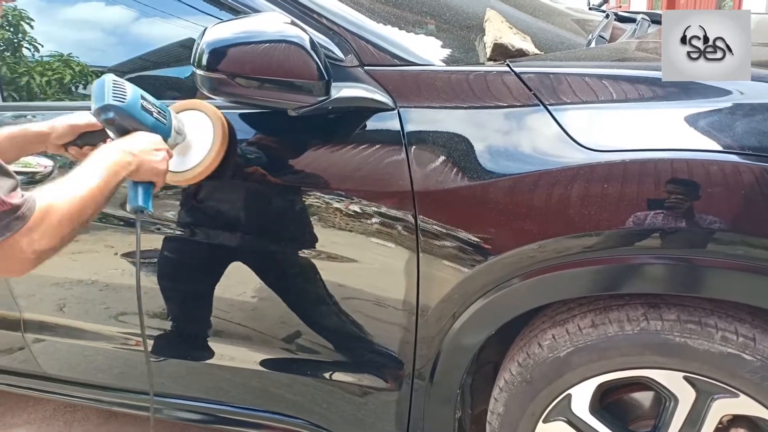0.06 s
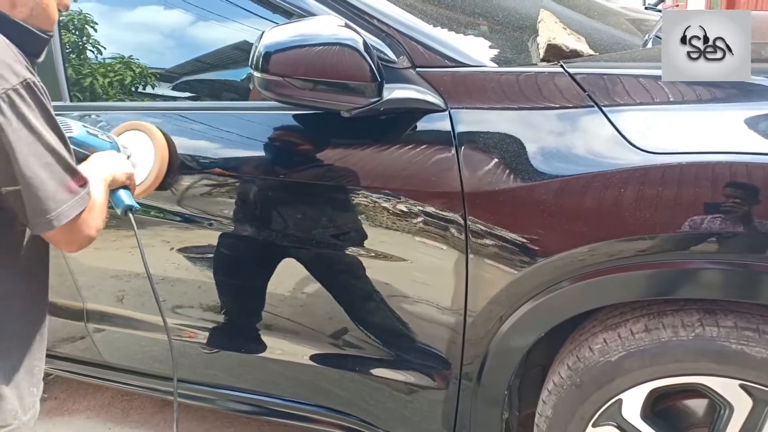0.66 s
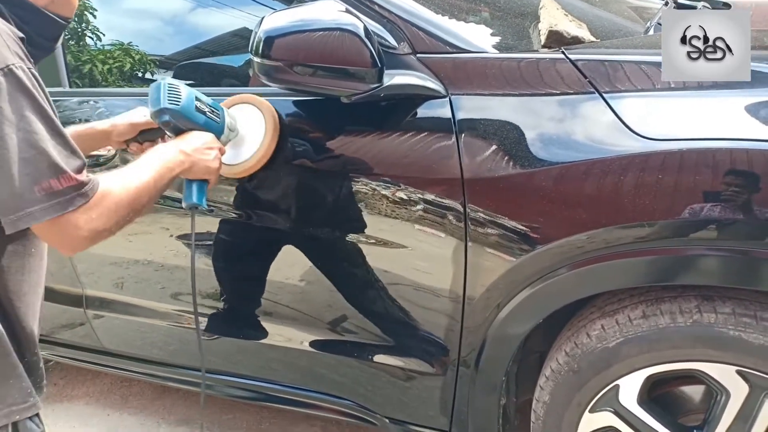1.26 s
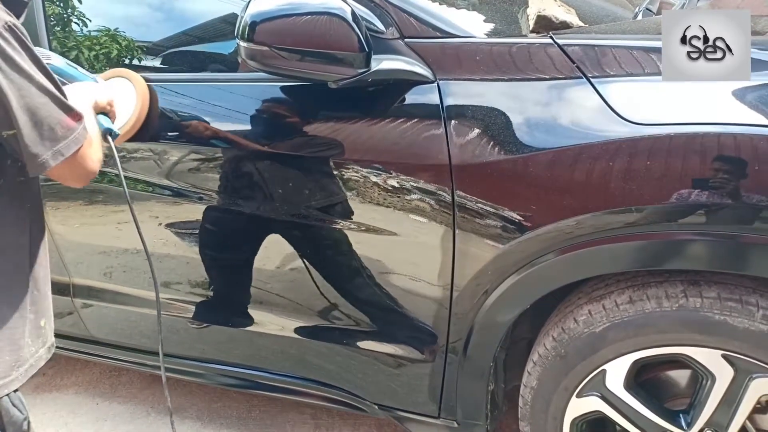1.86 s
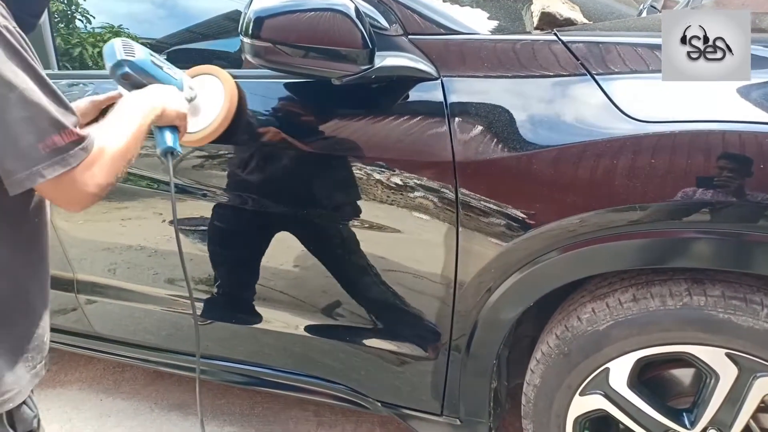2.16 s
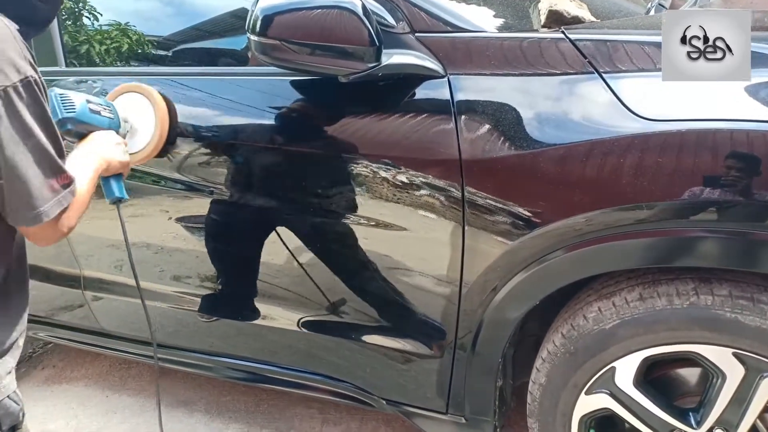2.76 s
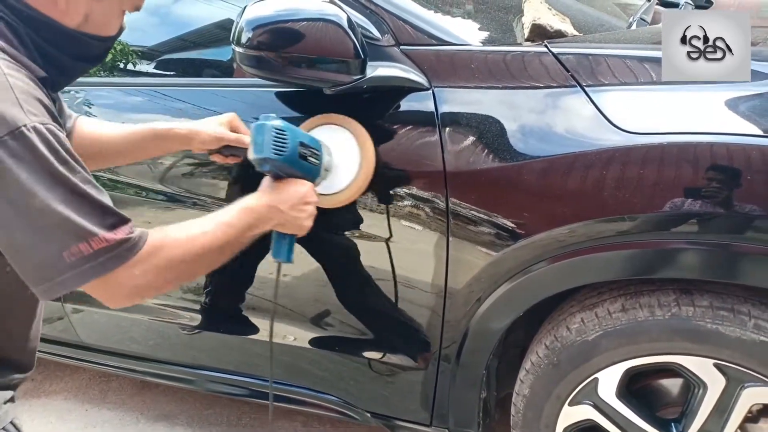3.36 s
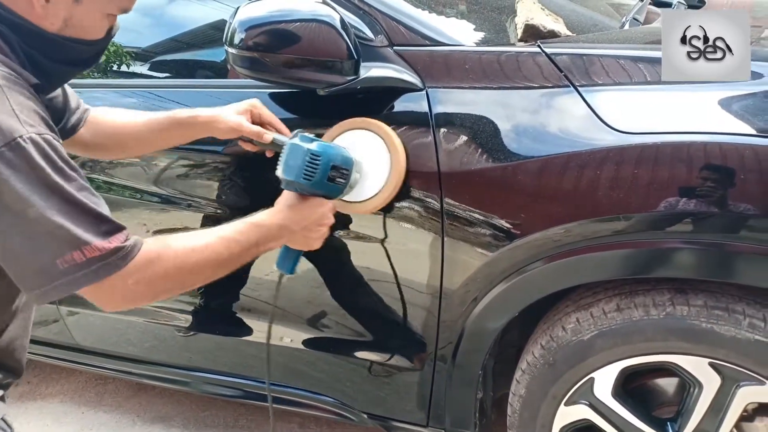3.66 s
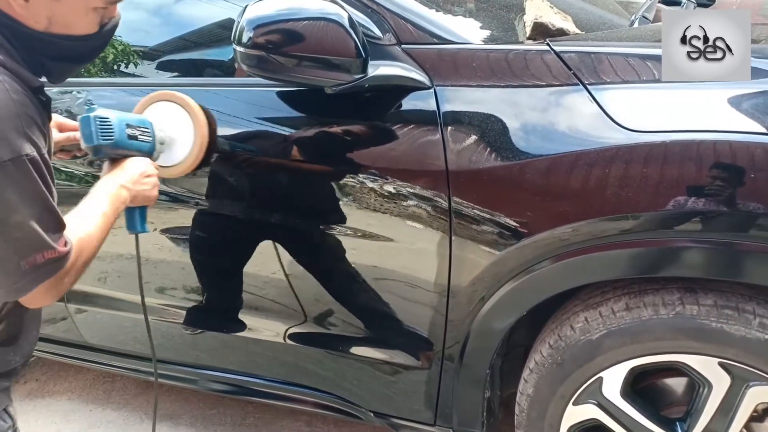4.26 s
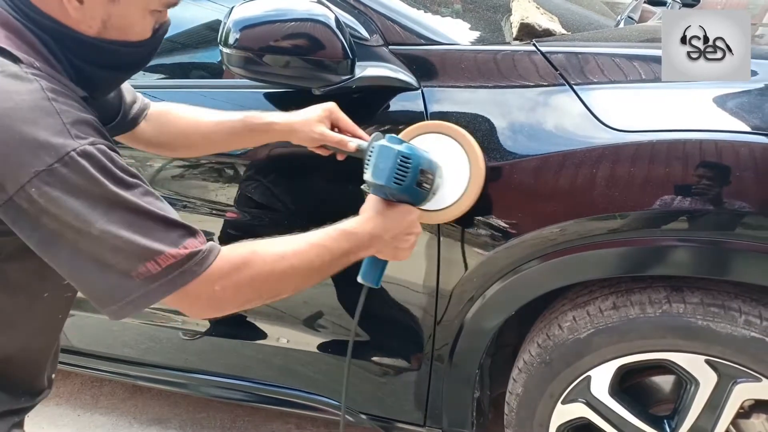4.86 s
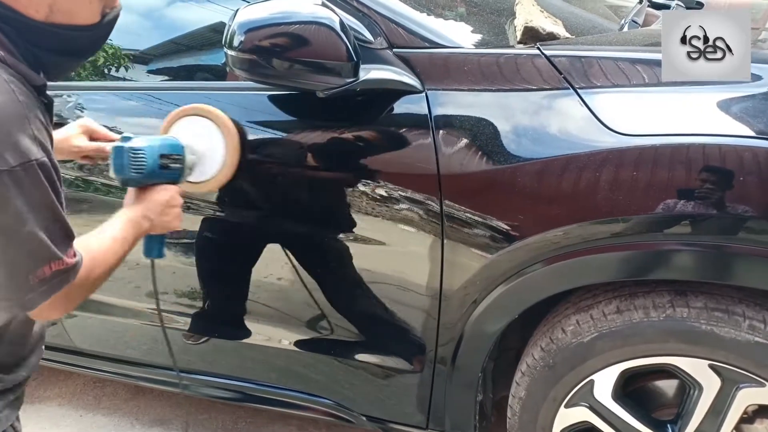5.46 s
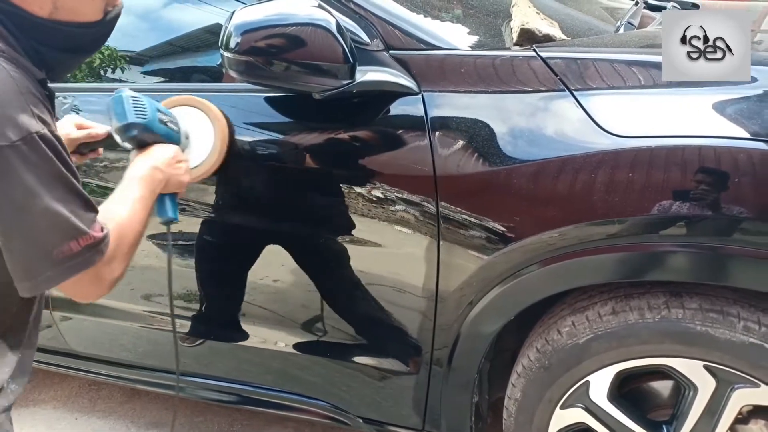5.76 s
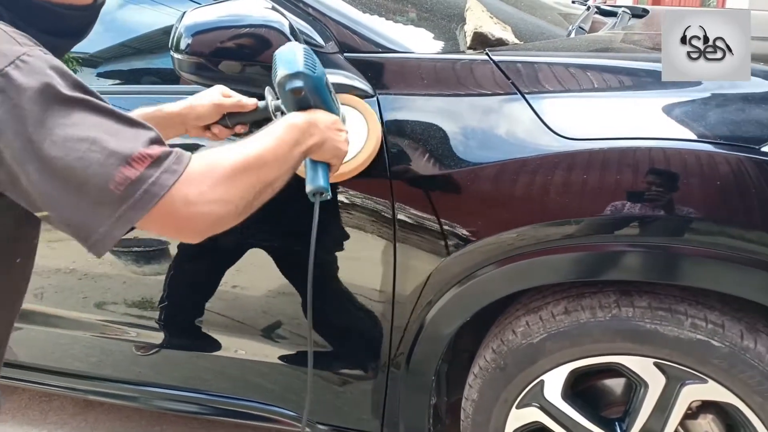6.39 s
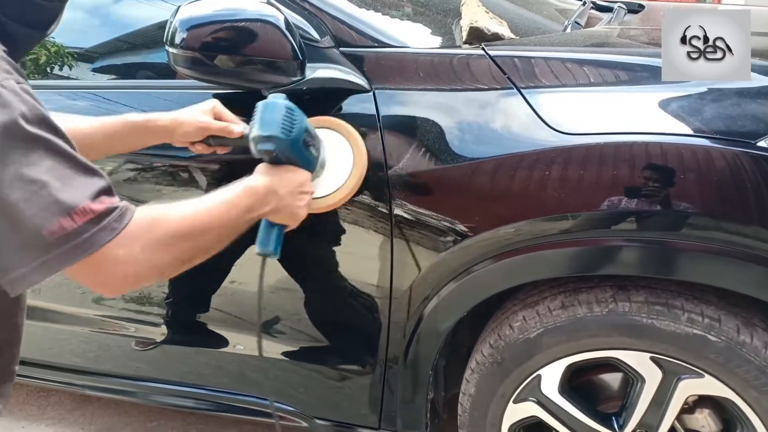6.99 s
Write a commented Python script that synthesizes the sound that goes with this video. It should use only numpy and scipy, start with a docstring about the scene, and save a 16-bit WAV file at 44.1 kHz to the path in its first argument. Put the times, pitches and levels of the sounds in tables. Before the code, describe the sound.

An electric rotary polisher runs without a break as its pad is worked to and fro over a car door. Its high, wavering whine dips and recovers about once a second, mixed with rushing air and light gear chatter. Midway the motor speeds up slightly and sounds hoarser, then sags again under pressure near the end. It is heard outdoors from a few metres away, over a faint low hum.

```python
"""A high whine that dips and recovers: an electric rotary polisher is worked to and fro over a car door.
The whine comes from the motor's small gear, whose teeth meet 22 times a turn. Each press on the pad
slows the motor and lowers the pitch. A second, slower shaft (the layshaft) adds tones, clatter and,
as the pad eases off, chatter. Cooling air rushes through the housing, all over a low outdoor hum.
A phone with two microphones hears it from a few metres away."""
import sys
import numpy as np
from scipy import signal
from scipy.fft import rfft, irfft
from scipy.io import wavfile
from scipy.ndimage import uniform_filter1d, map_coordinates

SR = 44100
rng = np.random.default_rng(int(sys.argv[2]) if len(sys.argv) > 2 else 0)


def store_wav(level_fs):
    """Save 16-bit WAV to argv[1]."""
    pcm = np.round(np.clip(np.atleast_2d(level_fs), -1, 1) * 32767)
    wavfile.write(sys.argv[1], SR, pcm.T.astype(np.int16))


N = 310015
TIME_S = np.arange(N) / SR
BIN_HZ = np.arange(N // 2 + 1) * SR / N
SIDES = np.array([[1], [-1]]) / 2  # splits a left-minus-right difference between the two sides


def undb(db):
    """Turn decibels into a gain."""
    return 10 ** (np.asarray(db) / 20)


def curves(table):
    """Join a table's points in time with straight lines, one curve for each value column."""
    times_s, *columns = np.transpose(table)
    return np.array([np.interp(TIME_S, times_s, column) for column in columns])


def spectrum(table):
    """Join a table's points in pitch, giving a value for every frequency."""
    hz, values = np.transpose(table)
    return np.interp(np.log(BIN_HZ + 1), np.log(hz), values)


def shape(sound, gain):
    """Filter a sound with one gain for each frequency."""
    return irfft(rfft(sound) * gain, N)


def below(hz, order=4):
    """Gains of a smooth filter that keeps what lies below hz."""
    return 1 / np.sqrt(1 + (BIN_HZ / hz) ** (2 * order))


def resonance(hz, centre_hz, width_hz):
    """A bell shape that is 1 at its centre."""
    return 1 / (1 + (2 * (hz - centre_hz) / width_hz) ** 2)


def swell(peak_s, rise_s, fall_s):
    """A smooth rise from 0 to 1 and back."""
    ramp = np.interp(TIME_S, [peak_s - rise_s, peak_s, peak_s + fall_s], [0, 1, 0])
    return np.sin(np.pi / 2 * ramp) ** 2


def flutter(hz, step=32):
    """A random wiggle with a typical size of 1, moving at rates up to about hz."""
    knots = np.arange(-SR // 2, N + step, step)
    smoothing = signal.butter(2, min(hz, SR / step / np.pi), fs=SR / step, output="sos")
    wiggle = signal.sosfilt(smoothing, rng.standard_normal(len(knots)))
    return np.interp(np.arange(N), knots, wiggle / wiggle.std())


def spin(cycles):
    """A tone as a turning arrow: its real part is the sound, and adding imaginary wiggles shakes it."""
    return np.exp(2j * np.pi * cycles)


# Tone colour of the outdoor hum: pitch_hz, relative_db
HUM_COLOUR = [(20, -17), (40, -28), (60, -12), (80, -13), (97, 0), (113, -35), (135, -7), (175, -4.5),
              (210, -10), (260, -7.5), (310, -14.5), (450, -11.5), (650, -17.5), (1500, -70)]
# How loud the hum is over time: time_s, gain_db
HUM_LOUDNESS = [(0, -45), (.5, -51), (3.6, -57.5), (4.4, -56), (5.2, -59), (5.85, -53), (7.03, -60)]
def outdoor_hum():
    """A low drone with one wavering note in it, nearly the same on both sides."""
    middle, side = shape(rng.standard_normal((2, N)), undb(spectrum(HUM_COLOUR)))
    drone = (middle + 0.72 * side * SIDES) / middle.std()
    note = np.sin(2 * np.pi * 134 * TIME_S + 1.76 * flutter(7.4))
    return (undb(-0.74) * drone + undb(-1.5) * note) * undb(curves(HUM_LOUDNESS) - 1.2 * SIDES)


def cooling_air(turns):
    """Three separate streams of rushing air, chopped once a turn by the fan."""
    return rng.standard_normal((3, N)) * (1 + 0.15 * np.cos(2 * np.pi * turns))


def tooth_clatter(lay_turns, harmonics=200):
    """Three streams of thin, sharp clatter: the same tooth flaws come round on every layshaft turn."""
    streams = []
    for _ in range(3):
        position = (lay_turns + .0008 * flutter(40)) % 1  # slack in the gears blurs the timing
        flaws = irfft(np.r_[0, spin(rng.random(harmonics))], 16 * harmonics)
        places = np.arange(len(flaws)) / len(flaws)
        streams.append(np.interp(position, places, flaws / flaws.std(), period=1))
    band = below(5300, order=2) * (1 - below(1200, order=2))
    return shape(np.array(streams), band) * undb(flutter(38))


def diffuse(streams, apart_hz, likeness):
    """Mix three streams into two: the microphones share the bass but mostly hear their own treble."""
    shared = np.maximum(below(apart_hz, order=1), likeness)
    return shape(streams[0], shared) + shape(streams[1:], np.sqrt(1 - shared ** 2))


def shaft_tones(turns, table, waver_db, blur_rad):
    """Wavering tones locked to a shaft; the higher ones drift more between the microphones."""
    tones = 0
    for multiple, db in table:
        phase = 2 * np.pi * (multiple * turns + rng.random()) + blur_rad * flutter(26)
        drift = min(multiple / 20, 1.3) * flutter(4.7) * SIDES
        tones += np.sqrt(2) * undb(db + waver_db * flutter(6.2)) * np.sin(phase + drift)
    return tones


# Tones locked to the motor shaft; those at 20, 21, 23 and 24 are side tones around the gear whine:
# cycles_per_motor_turn, relative_db
MOTOR_TONES = [(2, 21), (3, 12), (4, 19), (12, 15), (14, 13), (16, 15), (20, 18), (21, 22), (23, 20),
               (24, 19), (26, 15), (40, 21), (42, 15), (43, 18), (45, 23), (46, 16), (48, 24)]
# Tones of the second pair of gears: cycles_per_layshaft_turn, relative_db
LAYSHAFT_TONES = [(8, 15), (11, 10), (13, 18), (15, 12), (17, 13), (18, 11), (20, 17), (26, 18), (28, 14),
                  (29, 12), (30, 18), (32, 17), (36, 15), (37, 16), (43, 21), (57, 24), (58, 17), (60, 14),
                  (63, 17), (64, 20), (70, 16), (71, 19), (73, 19), (74, 18), (75, 14), (76, 19), (77, 15),
                  (79, 13)]
def running_noise(turns, lay_turns, sag_hz):
    """Air, clatter and shaft tones inside the tool; load makes the tones stand out of the noise."""
    tones = shaft_tones(turns, MOTOR_TONES, waver_db=2.5, blur_rad=.3)
    tones += shaft_tones(lay_turns, LAYSHAFT_TONES, waver_db=3, blur_rad=.35)
    rush = np.sqrt(SR / 2) * (undb(-8.5) * tooth_clatter(lay_turns) + undb(-4.5) * cooling_air(turns))
    return undb(-5 + 0.138 * sag_hz) * tones + diffuse(rush, apart_hz=2170, likeness=0.3)


# Borders between seven bands of the running noise: pitch_hz
BAND_EDGES = (1050, 1550, 2000, 3250, 4400, 5600)
# The bands from low to high (body, low vent rush, upper vent rush, gear case ring, rush with rasp,
# tooth rasp, hiss of brushes and pad): gain_db, share_of_vent_swell, db_per_hz_of_sag
BANDS = [(-1, 0.92, 0.12), (0, 1.26, -0.25), (0, 1.6, 0.0535), (-5, 0.7, 0.14), (7, 1.02, -0.42),
         (-2.5, 0.67, 0.08), (-2.5, 0.99, -0.0222)]
def swelling_bands(noise, sag_hz, vents_db):
    """Each band of the noise rises and falls in its own way with the load and the turning vents."""
    edges = [0, *(below(hz, order=8) for hz in BAND_EDGES), 1]
    sound = 0
    for (db, share, db_per_hz), low, high in zip(BANDS, edges, edges[1:]):
        level_db = db + share * vents_db + db_per_hz * sag_hz + .5 * flutter(5.8)
        sound += undb(level_db) * shape(noise, high - low)
    return sound


# Tone colour of the tool's housing: pitch_hz, gain_db
HOUSING_COLOUR = [(250.0, -73), (480.0, -80), (720.0, -69), (920, -68), (1120.0, -72.5), (1400.0, -68),
                  (1900.0, -62.5), (2750.0, -51.5), (3350.0, -66.5), (4250.0, -72), (5100.0, -65),
                  (6700.0, -72.5), (9000.0, -74.5), (12400.0, -78.5), (15500.0, -81.5)]
# How the two microphones differ in colour: pitch_hz, left_minus_right_db
MIC_COLOUR = [(250.0, -1.5), (1300.0, -1.5), (2100.0, 3), (2800.0, 4.5), (3700.0, 5.5), (4400.0, 1),
              (5800.0, -8.5), (7000.0, -1), (9500.0, 5.5), (11500.0, 7), (14000.0, -14.5), (15500.0, -16)]
# The phone's body shifts the wave between its microphones: pitch_hz, left_lead_rad
MIC_LEAD = [(600, 0), (1500, 0.64), (2400, 0)]
def housing(noise):
    """The housing, its thin ringing gear cover and the two microphones colour the running noise."""
    cover_db = 3.5 * resonance(BIN_HZ, centre_hz=4800, width_hz=420)
    colour = undb(spectrum(HOUSING_COLOUR) + cover_db + spectrum(MIC_COLOUR) * SIDES)
    phase_shift = np.exp(1j * spectrum(MIC_LEAD) * SIDES)
    bass_cut = 1 - below(248, order=2)
    return shape(noise, colour * phase_shift * bass_cut)


# The low tones of the growl: cycles_per_layshaft_turn, relative_db
GROWL_TONES = [(13, 0), (15, -6), (16, -8)]
def pad_growl(lay_turns, sag_hz):
    """The pressed pad drags on the gears, which growl louder the more the motor slows."""
    rasp = 0
    for multiple, db in GROWL_TONES:
        roughness = .8 + .42 * flutter(40) + .42j * flutter(40)
        rasp += undb(db) * roughness * spin(multiple * lay_turns)
    return np.sqrt(2) * undb(-70 + .75 * sag_hz) * np.real(rasp)


# The cluster of tones in each chatter: offset_cycles_per_layshaft_turn, relative_db
CHATTER_CLUSTER = [(-1, -6), (0, 0), (1, -5), (2, -8)]
# Spells of chatter as the pad is eased off: peak_s, length_s, level_db, cycles_per_layshaft_turn
CHATTER_SPELLS = [(0.806, 0.95, -41, 76), (1.86, 0.99, -41, 76), (2.91, 0.68, -33, 76),
                  (3.95, 0.41, -31, 76), (5.153, 0.97, -38.5, 75), (5.927, 0.55, -24.5, 30),
                  (6.097, 0.64, -28.5, 71)]
def gear_chatter(lay_turns, pan_db=-0.5):
    """Slack teeth scratch and ring in the housing on a few neighbouring pitches."""
    scratch = ring = 0
    for offset, db in CHATTER_CLUSTER:
        roughness = .7 + .5 * flutter(70) + .5j * flutter(70)
        scratch += undb(db) * roughness * spin(offset * lay_turns)
    for peak_s, length_s, db, multiple in CHATTER_SPELLS:
        ring += undb(db) * swell(peak_s, length_s / 2, length_s / 2) * spin(multiple * lay_turns)
    return np.real(scratch * ring) * undb(pan_db * SIDES)


# The low tone of the second pair of gears: time_s, level_db
SECOND_GEAR_TONE = [(0, -62), (1.6, -54.5), (2, -50), (2.5, -58), (3.2, -54), (4.1, -49), (4.6, -43.5),
                    (5.2, -46.5), (5.55, -52), (6.5, -41), (6.95, -54)]
# The stronger tone an octave above it: time_s, left_db, right_db
SECOND_GEAR_OCTAVE = [(0.0, -30, -25.5), (0.37, -25.5, -28.5), (0.75, -37, -41), (0.91, -33, -31),
                      (1.21, -29.5, -33), (1.44, -31, -31), (1.62, -41, -49), (1.81, -39, -34.5),
                      (2.56, -27, -29), (2.71, -34, -45), (2.89, -30, -31), (3.94, -30.5, -35),
                      (4.56, -32, -30), (4.71, -18.5, -22.5), (5.1, -20, -26.5), (5.46, -25.5, -32),
                      (5.64, -23, -26), (6.54, -30.5, -53), (6.67, -27, -28), (7.02, -31, -45)]
def second_gears(lay_turns, speed_hz, teeth=19):
    """The layshaft's teeth make a low tone and an octave that throbs and grows hoarse from gear slack."""
    throb = .3 * np.cos(2 * np.pi * lay_turns + 1.2 * flutter(14))
    hoarse = np.clip((speed_hz - 91.6) / 43, 0, 1)  # the faster the motor, the hoarser
    slack = 1 - .3 * hoarse + hoarse * (throb + .42 * flutter(80) + .4j * flutter(80))
    phase = 2 * np.pi * teeth * lay_turns
    mic_drift = 0.79 * np.array([flutter(0.28), flutter(2.27)])
    low_gain = undb(curves(SECOND_GEAR_TONE) + 1.1 * flutter(15))
    roughness = 0.99 + 0.25 * flutter(31) + .3j * flutter(35)
    low = low_gain * np.real(roughness * np.exp(1j * (phase + 0.31 * mic_drift)))
    octave_gain = undb(curves(SECOND_GEAR_OCTAVE) + flutter(3.3))
    octave = octave_gain * np.real(slack * np.exp(1j * (2 * phase + mic_drift)))
    return np.sqrt(2) * (low + octave)


# High tones of the teeth and gear case: cycles_per_motor_turn, level_db, db_per_hz_of_sag
WHISTLES = [(64, -55, .1), (66, -57, .55), (68, -58, .2), (70, -61, .2), (80, -65, .35), (88, -66, .95),
            (92, -68, .3)]
def gear_whistles(turns, speed_hz, sag_hz, vents_db, pan_db=5):
    """Thin whistles that come up under load and flare where the housing rings."""
    whistles = 0
    for multiple, db, db_per_hz in WHISTLES:
        ring_db = 7.5 * resonance(multiple * speed_hz, centre_hz=8900, width_hz=700)
        breakup = .7 + .45 * flutter(22) + .45j * flutter(40)  # the tooth contact shifts
        level_db = db + db_per_hz * sag_hz + ring_db + 0.45 * vents_db + flutter(7.8)
        tone = spin(multiple * turns) * np.exp(.7j * flutter(23))
        whistles += undb(level_db) * np.real(breakup * tone)
    return np.sqrt(2) * whistles * undb(pan_db * SIDES)


MOTOR_TEETH, WHEEL_TEETH = 22, 45  # the motor's small gear drives a larger wheel on the layshaft
# The whine swells and fades as the tool turns: time_s, left_db, right_db
WHINE_LOUDNESS = [(0.0, -13.5, -24), (0.13, -12.5, -16.5), (0.22, -16, -23), (0.25, -30, -37),
                  (0.31, -20, -28), (0.45, -23.5, -36), (0.55, -16.5, -28), (0.75, -20, -29),
                  (0.93, -11.5, -27.5), (1.17, -26, -29.5), (1.21, -20, -26), (1.32, -17.5, -23.5),
                  (1.39, -18, -35), (1.51, -21, -32), (1.59, -22.5, -42), (1.77, -24, -46),
                  (2.08, -10, -18), (2.19, -22, -35), (2.3, -17.5, -52), (2.39, -19, -30), (2.62, -16, -26),
                  (2.71, -27.5, -40), (2.78, -21, -31.5), (3.01, -13.5, -27), (3.13, -16.5, -31),
                  (3.22, -10.5, -19.5), (3.46, -14, -21), (3.55, -13.5, -21), (4.1, -27, -64),
                  (4.21, -20.5, -39), (4.37, -29.5, -61), (4.62, -21.5, -42), (4.68, -25, -25),
                  (4.86, -25.5, -29.5), (5.06, -22.5, -28), (5.1, -27, -30), (5.19, -24, -28),
                  (5.3, -21.5, -32), (5.39, -23.5, -33), (5.43, -27.5, -34), (5.63, -22.5, -36),
                  (5.84, -22.5, -46), (5.9, -23, -30), (5.94, -21.5, -30.5), (6.03, -20, -31),
                  (6.17, -35, -25), (6.21, -25, -44), (6.48, -13.5, -20), (6.59, -11.5, -18),
                  (6.81, -19.5, -18.5), (6.85, -21.5, -20.5), (7.02, -16.5, -21.5)]
# Its octave flares as load pulls it onto the gear case's ringing pitch: time_s, left_db, right_db
WHINE_OCTAVE = [(0.0, -39, -36), (0.2, -30, -27), (0.35, -30, -25), (0.61, -56, -38.5), (0.75, -43, -37),
                (0.85, -54, -51), (1.0, -47, -32.5), (1.33, -23, -19.5), (1.63, -43, -38), (1.98, -47, -36),
                (2.04, -47, -40), (2.1, -38, -26.5), (2.16, -29, -22.5), (2.29, -36, -33.5),
                (2.56, -29.5, -25), (2.65, -28.5, -36), (2.73, -58, -37), (2.84, -46, -45),
                (2.92, -52, -34), (3.1, -44, -39), (3.19, -55, -52), (3.35, -61, -30.5), (3.65, -52, -30.5),
                (3.82, -52, -49), (4.01, -52, -41), (4.24, -72, -50), (4.61, -45, -30), (4.7, -49, -34),
                (4.86, -48, -28.5), (5.16, -49, -33), (5.4, -61, -37), (5.75, -42, -33), (5.99, -44, -37),
                (6.06, -45, -41), (6.17, -48, -28), (6.3, -45, -26), (6.42, -43, -28), (6.55, -38, -30.5),
                (7.02, -51, -31.5)]
# Gear flaws add side tones around the whine: offset_cycles_per_motor_turn, relative_db
SIDE_TONES = [(-1.21, -20.5), (-1, -20), (.49, -29), (1, -16.5), (1.21, -19.5), (1.47, -28), (2, -27)]
def gear_whine(turns, sag_hz):
    """The motor gear's teeth make the main tone and its octave, shaken by flaws and uneven contact."""
    phase = 2 * np.pi * MOTOR_TEETH * turns + .09 * flutter(25)
    wobble = 0
    for offset, db in SIDE_TONES:
        gain = undb(db + 2.5 * flutter(7))
        wobble += gain * spin(offset * turns + rng.random()) * np.exp(.3j * flutter(25))
    grit = .08 * flutter(45) + .06j * flutter(60)
    tone_db = curves(WHINE_LOUDNESS)
    # The side tones fade less than the main tone, so the whine stutters in its quiet moments.
    slow_db = uniform_filter1d(tone_db, size=SR // 2)
    stutter = undb(-7.5 + 0.5 * slow_db + 0.036 * sag_hz) * (wobble + grit)
    tone_gain = undb(tone_db + 1.29 * flutter(11.4))  # chance fading as the tool moves beside the door
    tone = np.real((tone_gain + stutter) * np.exp(1j * phase))
    octave_gain = undb(curves(WHINE_OCTAVE) + 1.5 * flutter(7.7))
    octave_phase = 2 * phase + 0.2 * flutter(48)
    octave = octave_gain * np.real((1 + 0.42 * wobble + 2 * grit) * np.exp(1j * octave_phase))
    return np.sqrt(2) * (tone + octave)


# How much later the left microphone hears the tool: time_s, delay_ms
LEFT_DELAY = [(0, 0.22), (.3, 0.18), (.7, 0.21), (1.25, 0.16), (1.7, 0.22), (2.35, 0.16), (2.9, 0.21),
              (3.2, 0.16), (3.52, 0.065), (3.75, 0.078), (4.0, 0.19), (4.3, 0.19), (4.55, .15),
              (4.85, 0.03), (5.1, 0.013), (5.3, 0.077), (5.55, 0.22), (5.9, 0.17), (6.3, 0.11),
              (6.65, 0.043), (7.03, 0.073)]
def travel_along_door(pair):
    """The tool's place along the door sets how far apart in time the two microphones hear it."""
    delay_samples = curves(LEFT_DELAY) * SIDES * SR / 1000
    return np.array([map_coordinates(side, [np.arange(N) - delay], order=5, mode="mirror")
                     for side, delay in zip(pair, delay_samples)])


# Motor speed with no load, turned up midway: time_s, turns_per_s
UNLOADED_SPEED = [(3.01, 130.9), (4.42, 142.9)]
# Strokes that press the pad on the paint: peak_s, rise_s, fall_s, sag_hz
PAD_PRESSES = [(0.332, 0.57, 0.6, 14.2), (1.351, 0.69, 0.65, 15.1), (2.449, 0.673, 0.57, 19.985),
               (3.518, 0.48, 0.61, 10.1), (3.996, 0.33, 0.37, 4.8), (5.03, 0.65, 0.51, 8.13),
               (5.431, 0.339, 0.26, 5.5), (6.519, 0.72, 0.39, 11.86), (6.962, 0.56, 0.912, 17.6)]
# The air swells as the vents turn towards the phone: time_s, swell_db
VENT_SWELL = [(0.0, -0.5), (0.63, -5), (1.23, -1), (1.67, -4), (2.43, -1), (2.7, -2), (3.18, 1.4),
              (3.56, -1.1), (4.31, 1), (4.57, 3.5), (5.64, 4.5), (6.02, 6.5), (6.56, 4), (6.91, -0.5),
              (7.03, 2)]
def scene():
    """One motor drives every sound of the tool; its sag is the speed it loses when the pad is pressed."""
    sag_hz = sum(hz * swell(peak_s, rise_s, fall_s) for peak_s, rise_s, fall_s, hz in PAD_PRESSES)
    speed_hz = curves(UNLOADED_SPEED)[0] - sag_hz
    turns = np.cumsum(speed_hz) / SR  # motor turns so far
    lay_turns = turns * MOTOR_TEETH / WHEEL_TEETH  # layshaft turns so far
    vents_db = curves(VENT_SWELL)[0]
    gears = gear_whine(turns, sag_hz) + gear_whistles(turns, speed_hz, sag_hz, vents_db)
    gears += second_gears(lay_turns, speed_hz) + gear_chatter(lay_turns) + pad_growl(lay_turns, sag_hz)
    noise = swelling_bands(running_noise(turns, lay_turns, sag_hz), sag_hz, vents_db)
    return travel_along_door(gears + housing(noise)) + outdoor_hum()


def record(dry):
    """The phone cuts off the highest treble."""
    return signal.sosfilt(signal.ellip(10, .2, 80, 15700, fs=SR, output="sos"), dry)


dry = scene()
out = record(dry)
store_wav(out)
```